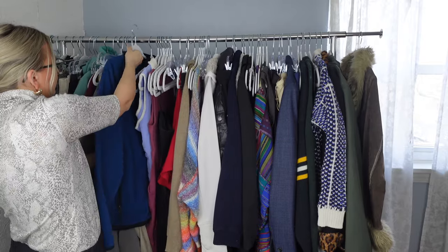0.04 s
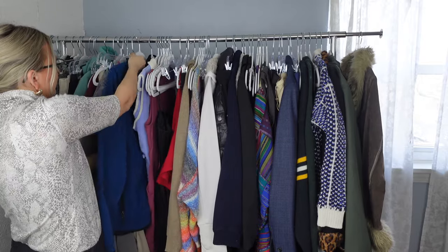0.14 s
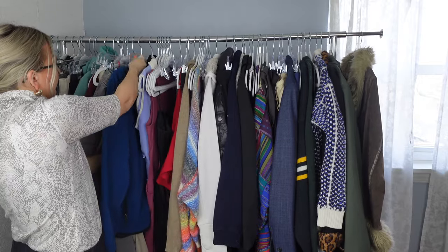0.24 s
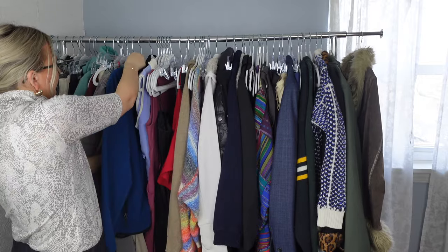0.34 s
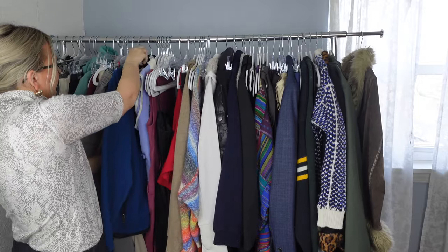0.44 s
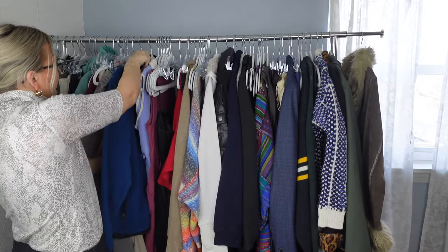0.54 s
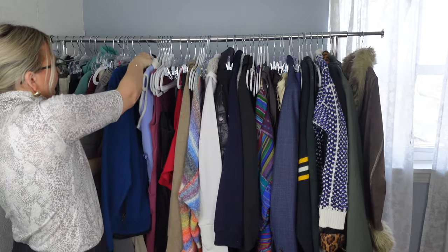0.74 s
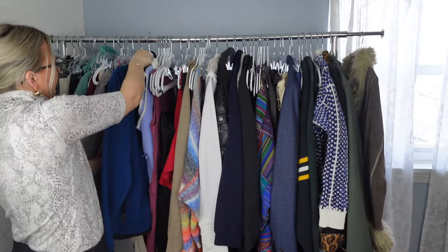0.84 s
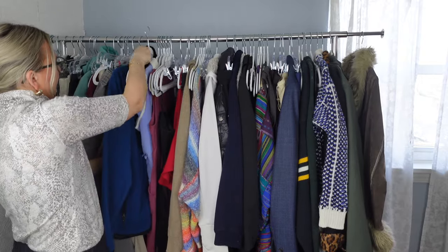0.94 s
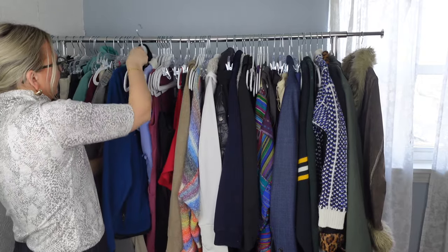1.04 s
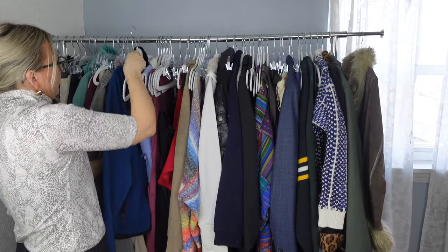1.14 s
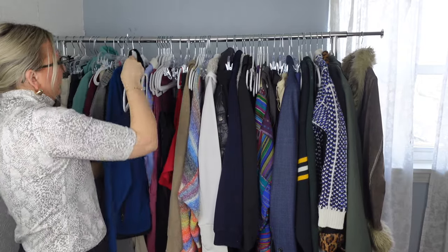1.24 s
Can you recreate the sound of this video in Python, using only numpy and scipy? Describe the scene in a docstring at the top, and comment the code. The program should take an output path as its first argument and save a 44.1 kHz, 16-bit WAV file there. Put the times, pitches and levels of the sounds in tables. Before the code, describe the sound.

Clothes hangers are pushed along a metal rail, clicking and briefly squeaking in a quiet room.

```python
"""Metal hanger hooks are pushed along a steel clothes rail in a small bedroom.
Clothes brush faintly over the steady hush of the room. From 0.1 s hooks clack on the rail
and on each other, and the rail rings; the hardest clack, at 0.24 s, shakes the rack.
At 0.75 s a sliding hook sticks and slips in a short squeak. At 1.08 s one is lifted off,
grazes its neighbour and rings freely."""
import sys
import numpy as np
from scipy import signal
from scipy.fft import rfft, irfft, next_fast_len
from scipy.io import wavfile

SR = 44100
rng = np.random.default_rng(int(sys.argv[2]) if len(sys.argv) > 2 else 0)


def dump_mix(stems):
    """Bounce the given channels to the path in sys.argv[1] as a 16-bit WAV at rate SR."""
    frames = np.atleast_2d(stems).T  # one column per channel
    limited = np.clip(frames, -1, 1)  # hard clip at full scale
    pcm = np.round(limited * 32767).astype(np.int16)
    wavfile.write(sys.argv[1], SR, pcm)


N = 57330
TIME = np.arange(N) / SR

# dense, quickly damped ring of hook and hanger: f/Hz, level/dB
HANGER_SPECTRUM = [(40, -66), (200, -34), (750, -39), (1050, -21.5), (1380, -13), (1750, -16.5),
                   (2700, -7.5), (3800, -5), (4500, 3.5), (5900, 0), (7100, 0), (8500, -4), (10000, -2.5),
                   (11300, -1.5), (12300, -3.5), (15500, -4)]


def from_db(db):
    """Decibels to gain."""
    return 10 ** (np.asarray(db) / 20)


def unit_rms(x):
    """Scale to rms 1."""
    return x / np.sqrt(np.mean(x ** 2) + 1e-20)


def at_hz(points, hz):
    """Read a table on a log-frequency axis."""
    f_hz, value = np.transpose(points)
    return np.interp(np.log(hz + 1e-9), np.log(f_hz), value)


def in_time(rows):
    """Columns of a time curve at every sample."""
    t_s, *columns = np.transpose(rows)
    return [np.interp(TIME, t_s, column) for column in columns]


def coloured(x, spectrum, bass_db=0, treble_db=0, bass_hz=3200, treble_hz=9130):
    """Minimum-phase filter: the given spectrum and two shelves."""
    size = 2 * next_fast_len(len(x))
    hz = np.arange(size // 2 + 1) * SR / size
    bass_shelf = 1 / (1 + (hz / bass_hz) ** 4)
    treble_shelf = 1 - 1 / (1 + (hz / treble_hz) ** 6)
    gain_db = at_hz(spectrum, hz) + bass_db * bass_shelf + treble_db * treble_shelf
    cepstrum = irfft(np.log(from_db(gain_db)))
    cepstrum[1:size // 2] *= 2  # fold onto positive time: causal
    cepstrum[size // 2 + 1:] = 0
    return irfft(rfft(x, size) * np.exp(rfft(cepstrum)))[:len(x)]


def low_pass(x, hz, order=2):
    """Butterworth low-pass."""
    return signal.sosfilt(signal.butter(order, hz, fs=SR, output="sos"), x)


def stereo(mid, side):
    """Left and right from mid and side."""
    return np.array([mid + side, mid - side])


def struck(modes, times_s, levels_db, split=0, count=1):
    """Each blow rings every mode as `count` partials with relative pitch spread `split`."""
    out, t = np.zeros(N + SR), TIME[:SR // 3]
    for start_s, blow_db in zip(times_s, levels_db):
        start = int(start_s * SR)
        for hz, mode_db, t60_s in modes:
            partials_hz = hz * (1 + split * rng.standard_normal((count, 1)))
            phase = 2 * np.pi * (partials_hz * t + rng.random((count, 1)))
            ring = np.sin(phase).sum(axis=0) / np.sqrt(count)
            out[start:start + len(t)] += from_db(blow_db + mode_db - 60 * t / t60_s) * ring
    return out[:N]


def hush(mid_db=-60.5, side_db=-5):
    """Steady room noise, wide in the bass and centred in the treble."""
    # room noise: f/Hz, level/dB
    spectrum = [(25, -38), (45, -37), (75, -12.5), (125, -5), (170, 1.5), (235, 2), (290, -2), (600, -4),
                (850, -8), (1300, -5), (1700, -11), (3000, -11.5), (5000, -14), (8000, -17.5),
                (15000, -21.5)]
    mid, side = (unit_rms(coloured(rng.standard_normal(N), spectrum)) for _ in range(2))
    return from_db(mid_db) * stereo(mid, from_db(side_db) * low_pass(side, hz=5340))


def friction(grain_db=3, grain_samples=32):
    """Tiny uneven slips sounding through the hooks; rms 1."""
    noise = rng.standard_normal(N)
    grains = np.repeat(rng.standard_normal(N // grain_samples + 1), grain_samples)[:N]
    slips = noise * from_db(grain_db * grains)
    return unit_rms(coloured(slips, HANGER_SPECTRUM, bass_db=12.5, treble_db=-2.5))


def brushing():
    """Hooks and cloth rub along in faint swells."""
    # friction envelope: t/s, level/dB
    swells = [(0, -56), (.05, -72), (.11, -66), (.19, -56), (.23, -72), (.36, -60.5), (.5, -70.5),
              (.7, -71.5), (.92, -70), (1.02, -100), (1.14, -58.5), (1.21, -65.5), (1.3, -71)]
    level_db, = in_time(swells)
    return from_db(level_db) * friction()


def clacks(tick_db=4.5, rail_db=-11.5):
    """Each contact is a tick and brief chatter; the rail rings on, and steel on steel zings."""
    # hook strikes: t/s, level/dB, chatter decay/s, bass/dB, treble/dB, rail ring/dB, zing/dB
    contacts = [(0.1125, -35, 0.0036, 4.5, -6.5, -2, -22), (0.1156, -30.5, 0.0031, 5.5, -10, -4, -20),
                (0.2142, -29.5, 0.0026, -5, 9, -8, 4), (0.2166, -19.5, 0.0042, -12, -8, 0.5, -7),
                (0.2197, -18.5, 0.0041, -15, -16, 5.5, -6), (0.2264, -35, 0.0062, -19, -7, -11, 7),
                (0.2405, -29.5, 0.0026, -22, -12, 14, -6), (0.2424, -18.5, 0.0035, 2.5, 1.5, -1, 2.5),
                (0.2470, -29.5, 0.0054, -1.5, -17, -2, 11), (0.2525, -21, 0.0022, 11.5, -41, 1.5, -5),
                (0.38, -44, 0.0072, 6.5, -5.5, -12, -18), (0.4212, -40.5, 0.005, -8, -6, -3, -15),
                (0.424, -34, 0.01, -1, -9, 0, -17), (0.6447, -25, 0.0017, -12, 2.5, -22, -25),
                (0.6467, -21.5, 0.0043, -6, -7, -3, -27), (0.6683, -40, 0.011, 11, -10, 4.5, -15),
                (1.0732, -38, 0.012, -2, -12, -12, -25), (1.077, -41, .004, -12, -19, -7, -20),
                (1.0987, -40, 0.011, -2, -7.5, -2, -11), (1.102, -42.5, .014, 6, -5.5, -12, -20)]
    # rail with hooks resting on it: f/Hz, level/dB, t60/s
    rail_modes = [(2751, -23, 0.1), (3118, -19, 0.13), (4370, -17, 0.16), (4610, -14.5, 0.14),
                  (5247, -10, 0.14), (5890, -14, .11), (5998, -8, 0.082), (6160, -24.5, .11),
                  (7160, -16.5, .11), (11270, -15.5, 0.087)]
    # steel sliding on steel: f/Hz, level/dB, t60/s
    zing_modes = [(13760, -12, 0.061), (13680, -7.5, .04)]
    hits, t = np.zeros(N), TIME[:SR // 10]
    for start_s, hit_db, chatter_s, bass_db, treble_db, _, _ in contacts:
        force = rng.standard_normal(len(t)) * np.exp(-t / chatter_s)
        force[0] = from_db(tick_db)
        start = int(start_s * SR)
        hits[start:start + len(t)] += from_db(hit_db) * coloured(force, HANGER_SPECTRUM, bass_db, treble_db)
    times_s, levels_db, *_, ring_db, zing_db = np.transpose(contacts)
    split = 0.0148  # touching hooks split each mode into a cluster
    rail = struck(rail_modes, times_s, levels_db + ring_db + rail_db, split, count=3)
    zing = struck(zing_modes, times_s, levels_db + zing_db, split, count=6)
    return hits + rail + zing


def rack_thud(start_s=0.243, level_db=-72.5, t60_s=0.94):
    """The hardest clack sets the whole rack in a faint low shudder."""
    # rack shudder: f/Hz, level/dB
    spectrum = [(30, -38), (70, -3), (130, -2.5), (300, -25), (900, -54)]
    age_s = TIME - start_s
    envelope = (age_s > 0) * from_db(level_db - 60 * abs(age_s) / t60_s)
    return envelope * unit_rms(coloured(rng.standard_normal(N), spectrum))


def squeak(waver_depth=0.0324):
    """A sliding hook scrapes, then catches in a wavering stick-slip tone that sets the rail ringing."""
    # stick-slip on the rail: t/s, tone/dB, slip rate/Hz, scrape/dB
    stick_slip = [(.752, -60, 2530, -66), (.762, -57, 2660, -55), (.767, -51, 2520, -47.5),
                  (.772, -55, 2680, -52), (.776, -46, 2450, -46), (.785, -40, 2800, -50),
                  (.791, -48, 2970, -54.5), (.798, -72, 2760, -75)]
    # slip harmonics from the fundamental up: level/dB
    harmonics_db = [-8, 3.5, -9.5, -30, -16]
    # rail resonance near 5.5 kHz: f/Hz, level/dB, t60/s
    ring_modes = [(5200, -63, .25), (5400, -61, .25), (5510, -61, .2), (5730, -62, .2)]
    tone_db, slip_hz, scrape_db = in_time(stick_slip)
    waver = unit_rms(low_pass(rng.standard_normal(N), hz=600))
    phase = 2 * np.pi * np.cumsum(slip_hz * (1 + waver_depth * waver)) / SR
    tone = unit_rms(sum(from_db(db) * np.sin(k * phase) for k, db in enumerate(harmonics_db, 1)))
    sliding = (TIME > stick_slip[0][0]) & (TIME < stick_slip[-1][0])
    slide = sliding * (from_db(tone_db) * tone + from_db(scrape_db) * friction())
    rail_response = struck(ring_modes, times_s=[0], levels_db=[0])
    return slide + signal.fftconvolve(slide, rail_response)[:N]


def lifted_hook():
    """A hook leaves the rail, grazes its neighbour and rings freely."""
    # two light touches: t/s, level/dB
    touches = [(1.0757, -60), (1.1005, -57.5)]
    # free hook: f/Hz, level/dB, t60/s
    ring_modes = [(1695, -3, 0.13), (2430, -6, 0.22), (3286, 3.5, 0.2), (3330, 1, 0.37), (4700, -7, .22),
                  (5077, -4.5, .25), (5100, 3, 0.18), (7104, 4, 0.11)]
    return struck(ring_modes, *np.transpose(touches))


def bedroom(x, early_db=-9, tail_db=-6.5, side_db=-6, early_s=0.009, onset_s=0.0018):
    """Quick reflections from wall and ceiling, then a short tail that dies sooner in the treble."""
    # room decay: f/Hz, t60/s
    decay = [(500, 0.33), (2600, 0.3), (5000, 0.2), (8000, 0.18), (14000, 0.13)]
    t, edges_hz = TIME[:SR // 2], np.geomspace(200, 18000, num=11)
    white, tail = rng.standard_normal((2, 2, len(t))), 0
    for k, band_hz in enumerate(zip(edges_hz, edges_hz[1:])):
        noise = signal.sosfilt(signal.butter(2, band_hz, "band", fs=SR, output="sos"), white[k % 2])
        t60_s = at_hz(decay, np.sqrt(np.prod(band_hz)))
        tail = tail + noise * from_db(-60 * t / t60_s)
    sparse_taps = rng.standard_normal((2, len(t))) * (rng.random((2, len(t))) < 0.05)
    early = sparse_taps * np.exp(-t / early_s)
    onset = 1 - np.exp(-(t / onset_s) ** 2)
    echoes = from_db(tail_db) * unit_rms(tail * onset) + from_db(early_db) * unit_rms(early * onset)
    mid, side = (signal.fftconvolve(x, echo)[:N] for echo in echoes / np.sqrt(len(t)))
    return stereo(x + mid, from_db(side_db) * low_pass(side, hz=8800, order=4))


def scene():
    """The hangers sound in the room, over its hush."""
    return hush() + bedroom(brushing() + clacks() + rack_thud() + squeak() + lifted_hook())


def record(dry):
    """Steep elliptic low-pass."""
    cutoff_hz = 15900
    return signal.sosfilt(signal.ellip(12, 0.1, 80, cutoff_hz, fs=SR, output="sos"), dry)


dry = scene()
out = record(dry)
dump_mix(out)
```